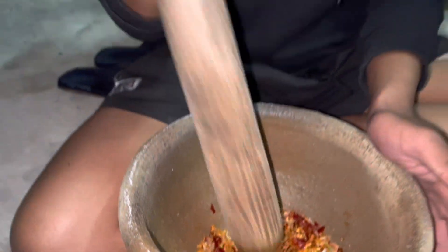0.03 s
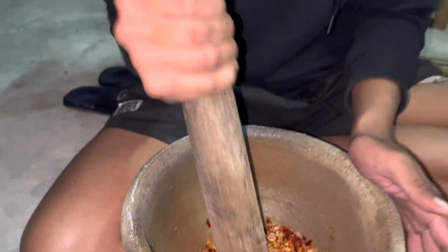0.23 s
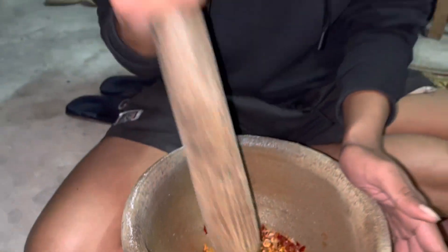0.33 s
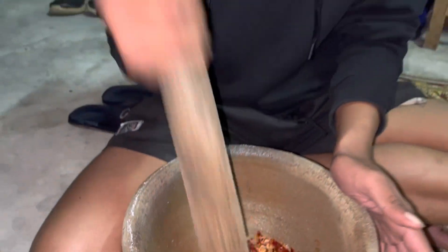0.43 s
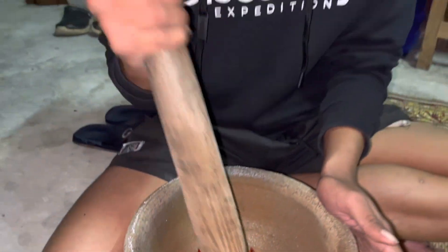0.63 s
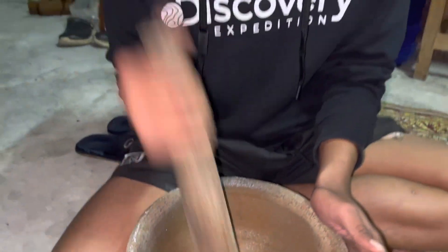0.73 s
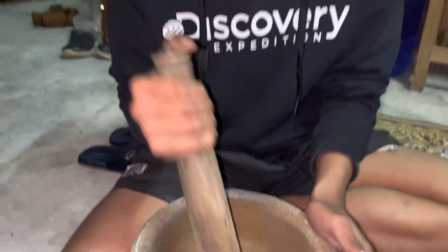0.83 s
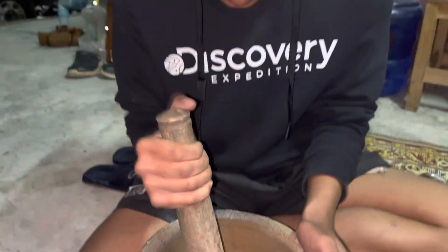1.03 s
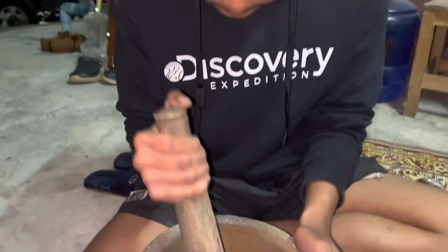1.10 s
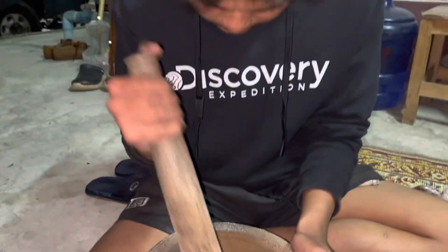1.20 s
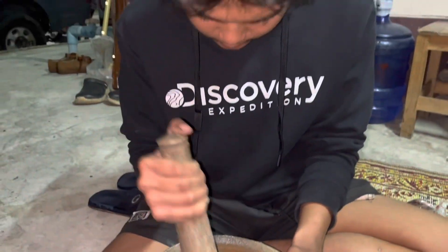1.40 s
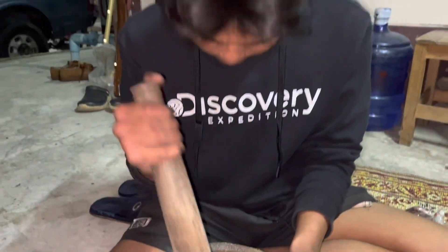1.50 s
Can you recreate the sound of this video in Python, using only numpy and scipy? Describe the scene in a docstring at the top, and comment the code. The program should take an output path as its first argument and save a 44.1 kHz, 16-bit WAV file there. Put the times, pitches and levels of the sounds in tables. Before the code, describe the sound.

A wooden pestle pounds chillies in a large mortar, close to the microphone. Five steady blows each crunch through the food and thud on the bowl, which rings briefly. A faint low hum lies underneath.

```python
"""Opens on a low hum, a faint high whirr, a rustle and the dying ring of a large mortar just struck.
From 0.2 s a wooden pestle pounds chillies in it, close by: five steady blows, about 0.29 s apart.
Each crunches through the food, then clacks and thuds on the bowl; a thicker cushion dulls the knock.
The bowl rings briefly, the room answers, and the food ticks as it settles."""
import sys
import numpy as np
from scipy import signal
from scipy.fft import rfft, irfft, next_fast_len
from scipy.io import wavfile
from scipy.ndimage import uniform_filter1d, minimum_filter1d

SR = 44100
rng = np.random.default_rng(int(sys.argv[2]) if len(sys.argv) > 2 else 0)


def master_out(mix):
    """Clip the mix to full scale and print it as 16-bit PCM to the path in sys.argv[1]."""
    frames = np.transpose(np.atleast_2d(mix))
    ceiling = np.clip(frames, -1, 1)
    pcm = np.round(ceiling * 32767).astype(np.int16)
    wavfile.write(sys.argv[1], SR, pcm)


N = 68355
N_FFT = next_fast_len(N + SR // 2, True)
FREQ_HZ = np.fft.rfftfreq(N_FFT, 1 / SR)
TIME_S = np.arange(N) / SR

# hum and whirr spectrum: freq_hz, gain_db
HUM_SPECTRUM = [(20, -24.5), (40, -5.5), (65, 3.5), (120, -1), (180, -9.5), (280, -19.5), (400, -15),
                (520, -22), (700, -29), (1000, -33), (1350, -32.5), (1700, -37.5), (3000, -49),
                (6500, -54.5), (7500, -35), (8700, -61), (11000, -57.5), (15000, -65)]
# narrow noise bands: centre_hz, half_width_hz, level_db
DRONE_BANDS = [(102, 3.4, -66.5), (334.5, 7.2, -72.5), (2059, 110, -68.5)]
# rustle envelope: time_s, level_db
RUSTLE_ENVELOPE = [(0, -75.5), (.09, -72), (.15, -90), (.42, -85), (.6, -82.5), (.72, -76), (.92, -73.5),
                   (1.2, -83), (1.3, -75), (1.55, -76)]
# rustle spectrum: freq_hz, gain_db
RUSTLE_SPECTRUM = [(800, -10), (2600, 4), (4000, 0), (7000, -4), (8600, -11.5), (10500, -3.5), (13300, -4),
                   (15500, -24)]
# blows: contact_s, force_db, corner_hz (low = cushioned), follow_gain (+ sinks on, - rebounds),
# ring_t60_ratio, clack_db, crunch_db, crunch_rise_s (per 60 dB)
PESTLE_BLOWS = [(-0.085, -10, 895, -0.63, 0.8, -40, -36, .03),
                (0.1999, -3, 996, -0.29, 1.1, -21.5, -32.5, .027),
                (0.4878, -10, 370, -.88, .95, -34, -31, 0.021),
                (0.7656, -4, 1690, 0.09, 1.195, -20.5, -30, 0.019),
                (1.0458, -0.5, 467, .34, 0.73, -40.5, -33, 0.03),
                (1.344, -2.5, 204, .28, .7, -32, -35, 0.039)]
# dead knock of pestle on bowl: freq_hz, gain_db
KNOCK_SPECTRUM = [(25, -2.5), (45, 13), (68, 29.5), (110, 31), (160, 26), (300, 28), (395, 22), (600, 28),
                  (880, 29), (1400, 18), (1850, 14), (2450, 20.5), (2900, 8.5), (4000, 20), (8000, 17.5)]
# modes of bowl and pestle: pitch_hz, level_db, t60_s
BOWL_MODES = [(120, -21.5, .22), (255.7, -34, 0.36), (331.5, -27, .38), (405.7, -28, 0.14),
              (480.2, -23.5, 0.31), (523, -3.5, 0.068), (536, -21.5, 0.17), (645.4, -30.5, 0.15),
              (878, -29, 0.15), (1135, -13, 0.036)]
# late arrival of the bass: freq_hz, delay_s
GROUP_DELAY = [(50, 0.026), (100, 0.0106), (200, 0.00835), (350, 0.0024), (700, 0.0015), (2000, 0)]
# echoes off nearby surfaces: delay_s, gain_db
NEAR_ECHOES = [(.01, -22), (0.01, -15.5), (0.0243, -24.5), (0.0392, -20)]
# crunch and snap spectrum: freq_hz, gain_db
CRUNCH_SPECTRUM = [(200, -2), (700, -2), (1500, -1), (2200, 0), (3000, -6.5), (4000, -3), (7000, -9.5),
                   (8500, -15), (10500, -17), (13300, -14.5), (14500, -26.5), (15700, -46.5)]
# clack of the wooden pestle: pitch_hz, level_db, t60_s
PESTLE_MODES = [(2231, -0.5, 0.021), (2427, -4.5, 0.008)]
# settling food: start_s, level_db
FOOD_TICKS = [(.3235, -56), (.853, -49.5), (1.18, -60), (1.256, -60), (1.42, -55.5), (1.472, -53),
              (1.503, -58.5), (1.524, -52)]
# tick spectrum: freq_hz, gain_db
TICK_SPECTRUM = [(1000, -19), (3500, -4.5), (8500, -6.5), (13000, -2.5), (15500, -4)]
# room decay: freq_hz, t60_s
ROOM_DECAY = [(70, 0.53), (200, 0.36), (500, 0.31), (1200, 0.28), (3000, .25), (10000, 0.24)]
# room width, bass nearly mono: freq_hz, side_db
ROOM_SIDE = [(60, -18.5), (130, -14.5), (280, -5), (1000, -0.5), (3000, -5)]
# left level over right: freq_hz, gain_db
LEFT_GAIN = [(100, 0.66), (280, 1.95), (500, -1.5), (1000, 0), (2500, 2.2), (5000, 5), (9000, -0.1)]
# left phase ahead of right: freq_hz, lead_rad
LEFT_PHASE = [(100, 0), (330, -.05), (470, -.45), (700, -.05), (1500, -.1), (3000, .9), (4500, 1.1),
              (6000, -.6), (8000, -3), (11000, -6), (14000, -8.3)]


def amp(db):
    """Decibels to gain."""
    return 10 ** (np.asarray(db) / 20)


def unit_rms(x):
    """Scale to rms 1."""
    return x / np.sqrt(np.mean(x ** 2) + 1e-20)


def curve(points, at_hz=FREQ_HZ):
    """Interpolate on a log frequency axis."""
    freq_hz, values = np.transpose(points)
    return np.interp(np.log(at_hz + 1), np.log(freq_hz + 1), values)


def filtered(x, response):
    """Apply a frequency response."""
    return irfft(rfft(x, N_FFT) * response, N_FFT)[..., :N]


def minimum_phase(gain):
    """Causal response with this gain."""
    cepstrum = irfft(np.log(np.maximum(gain, 1e-6)), N_FFT)
    cepstrum[1:N_FFT // 2] *= 2
    cepstrum[N_FFT // 2 + 1:] = 0
    return np.exp(rfft(cepstrum))


def delay(delay_s):
    """Response of a pure delay."""
    return np.exp(-2j * np.pi * FREQ_HZ * delay_s)


def noise(gain):
    """Coloured noise, rms 1."""
    return unit_rms(filtered(rng.standard_normal(N), gain))


def stereo(mid, side):
    """Mid/side to left/right."""
    return np.array([mid + side, mid - side])


def in_room(x, wet_db, onset_s=0.0044):
    """Dry sound plus a diffuse tail; each band decays at its own rate."""
    band_hz, frame_s, bands = signal.stft(rng.standard_normal((2, SR // 2)), SR, nperseg=256)
    decay = amp(-60 * frame_s / curve(ROOM_DECAY, band_hz)[:, None])
    tail = signal.istft(bands * decay, SR, nperseg=256)[1]
    tail *= 1 - np.exp(-(TIME_S[:tail.shape[1]] / onset_s) ** 2)
    mid, side = filtered(x, rfft(tail / np.linalg.norm(tail[0]), N_FFT))
    return x + amp(wet_db) * stereo(mid, filtered(side, amp(curve(ROOM_SIDE))))


def background(hum_db=-55.5, side_db=-19):
    """Low hum, faint high whirr and three narrow drones; nearly mono."""
    def layer():
        drones = sum(amp(db) * noise(1 / (1 + ((FREQ_HZ - hz) / half_width_hz) ** 4))
                     for hz, half_width_hz, db in DRONE_BANDS)
        return amp(hum_db) * noise(amp(curve(HUM_SPECTRUM))) + drones
    return stereo(layer(), amp(side_db) * layer())


def rustle():
    """Sleeve or stirred food, faintly coming and going."""
    level_db = np.interp(TIME_S, *np.transpose(RUSTLE_ENVELOPE))
    return amp(level_db) * noise(amp(curve(RUSTLE_SPECTRUM)))


def contact(corner_hz, order=2.816):
    """Pestle push as a low-pass: longer contact, less treble."""
    return minimum_phase(1 / np.sqrt(1 + (FREQ_HZ / corner_hz) ** (2 * order)))


def thuds(follow_hz=135, follow_s=0.0048, echo_corner_hz=1300):
    """Push and follow-through drive the dead knock and the modes of the hand-damped bowl."""
    bass_lag = np.exp(2j * np.pi * np.cumsum(curve(GROUP_DELAY)[::-1])[::-1] * FREQ_HZ[1])
    echoes = sum(amp(db) * delay(delay_s) for delay_s, db in NEAR_ECHOES)
    surfaces = 1 + echoes / (1 + (FREQ_HZ / echo_corner_hz) ** 2)
    knock = minimum_phase(amp(curve(KNOCK_SPECTRUM)))
    follow_through = contact(follow_hz) * delay(follow_s)
    age_s = TIME_S[:SR // 2]
    out = np.zeros((2, N))
    for contact_s, force_db, corner_hz, follow_gain, t60_ratio, *_ in PESTLE_BLOWS:
        ring = sum(amp(db - 60 * age_s / (t60_s * t60_ratio)) * np.cos(2 * np.pi * hz * age_s)
                   for hz, db, t60_s in BOWL_MODES)
        bowl = knock + rfft(ring, N_FFT)
        push = contact(corner_hz) + follow_gain * follow_through
        thud = irfft(bowl * push * bass_lag * surfaces * delay(contact_s), N_FFT)[:N]
        out += in_room(amp(force_db) * thud, wet_db=-14.5)
    return out


def crunch(fall_t60_s=0.017, grain_db=3.5):
    """Food crackles louder as it is squeezed and stops once the pestle seats."""
    colour = unit_rms(amp(curve(CRUNCH_SPECTRUM)))
    out = np.zeros((2, N))
    for contact_s, *_, crunch_db, rise_s in PESTLE_BLOWS:
        age_s = TIME_S - contact_s
        squeeze_db = -60 * np.maximum(-age_s / rise_s, age_s / fall_t60_s)
        flicker = unit_rms(uniform_filter1d(rng.standard_normal(N), size=30))
        grain = unit_rms(amp(grain_db * flicker))
        crackle = amp(crunch_db + squeeze_db) * grain * rng.standard_normal(N)
        out += in_room(filtered(crackle, colour), wet_db=-10.5)
    return out


def clacks(snap_relative_db=-6, snap_t60_s=0.0065):
    """The pestle snaps and rings briefly where it meets bare bowl."""
    ring, snap_envelope = np.zeros(N), np.zeros(N)
    for contact_s, *_, clack_db, _, _ in PESTLE_BLOWS:
        age_s = np.maximum(TIME_S - contact_s, 0)
        ring += sum(amp(clack_db + db - 60 * age_s / t60_s) * np.sin(2 * np.pi * hz * age_s)
                    for hz, db, t60_s in PESTLE_MODES)
        snap_db = clack_db + snap_relative_db - 60 * age_s / snap_t60_s
        snap_envelope += amp(snap_db) * (TIME_S >= contact_s)
    snap = snap_envelope * noise(amp(curve(CRUNCH_SPECTRUM)))
    return in_room(ring + snap, wet_db=-22)


def ticks(t60_s=0.008):
    """Moist food ticks as it settles after a blow."""
    envelope = sum(amp(db - 60 * np.abs(TIME_S - start_s) / t60_s) * (TIME_S >= start_s)
                   for start_s, db in FOOD_TICKS)
    return envelope * noise(amp(curve(TICK_SPECTRUM)))


def scene():
    """Mortar just left of centre, over the background."""
    mortar = thuds() + clacks() + crunch() + ticks() + rustle()
    share = np.array([[0.5], [-0.5]])  # left, right
    placement = amp(share * curve(LEFT_GAIN)) * np.exp(1j * share * curve(LEFT_PHASE))
    return filtered(mortar, placement) + background()


def record(dry, ceiling=0.93, window_samples=133, cutoff_hz=15700):
    """Fast peak limiter, then a brick-wall low-pass."""
    needed_gain = ceiling / np.maximum(np.abs(dry).max(axis=0), ceiling)
    gain = uniform_filter1d(minimum_filter1d(needed_gain, window_samples), window_samples)
    return filtered(dry * gain, FREQ_HZ < cutoff_hz)


dry = scene()
out = record(dry)
master_out(out)
```